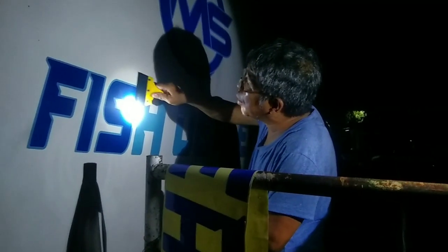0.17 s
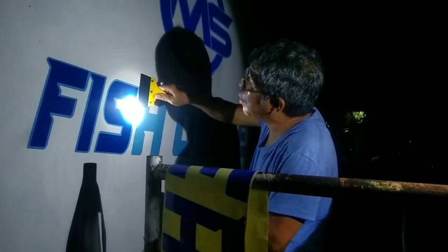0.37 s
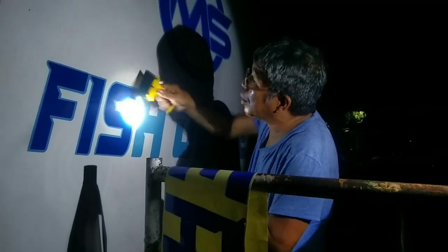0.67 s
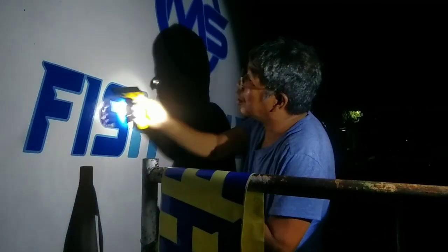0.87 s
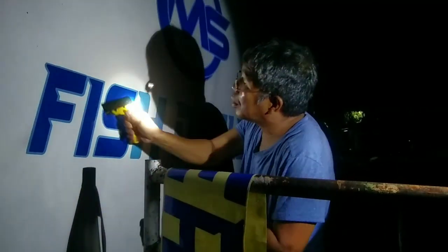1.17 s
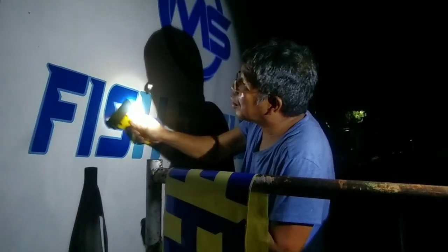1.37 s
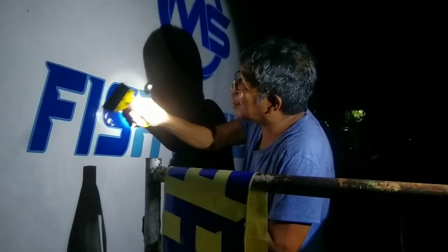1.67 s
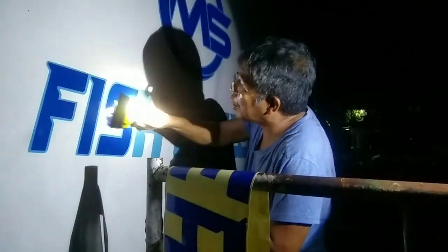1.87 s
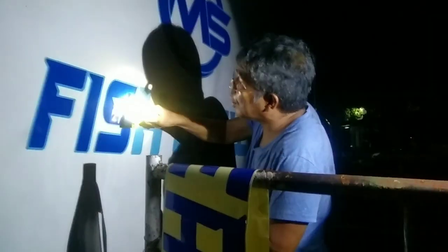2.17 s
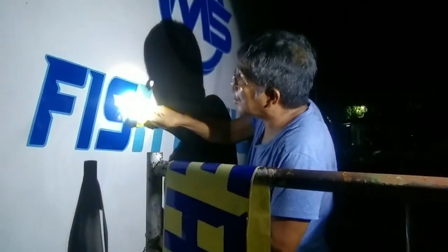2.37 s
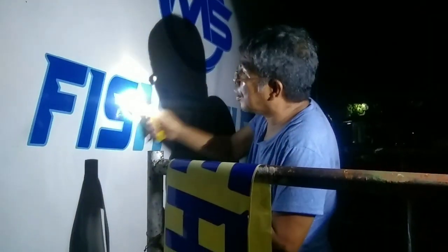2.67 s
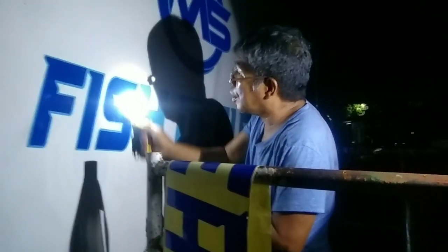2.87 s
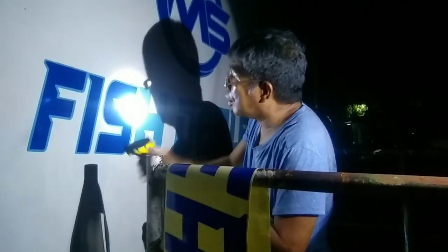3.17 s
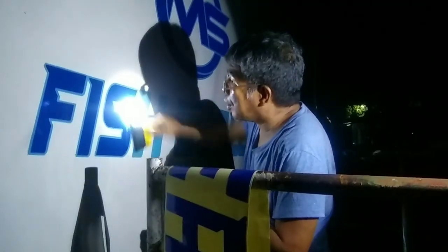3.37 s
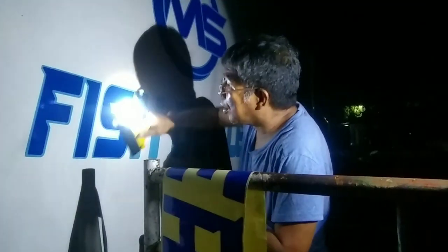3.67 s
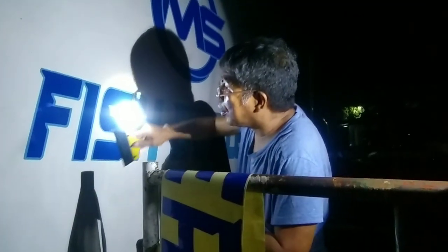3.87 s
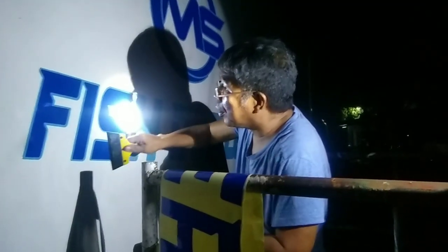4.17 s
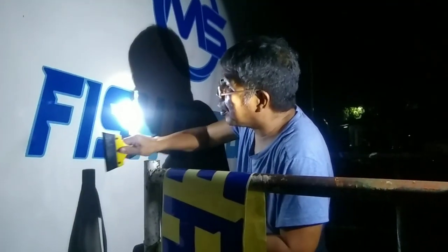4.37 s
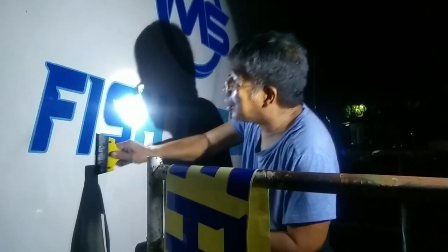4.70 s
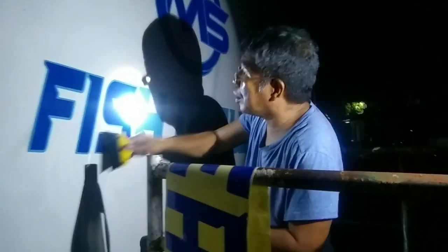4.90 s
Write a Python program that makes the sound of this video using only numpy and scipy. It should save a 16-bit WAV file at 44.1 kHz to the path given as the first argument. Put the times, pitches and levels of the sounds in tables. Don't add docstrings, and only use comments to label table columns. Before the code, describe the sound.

A close cricket chirps rapidly and steadily at night while a plastic squeegee softly rubs and taps a painted panel over faint engine hum.

```python
import sys
import numpy as np
from scipy import signal
from scipy.fft import rfft, irfft, next_fast_len
from scipy.io import wavfile
from scipy.ndimage import uniform_filter1d, map_coordinates

SR = 44100
rng = np.random.default_rng(int(sys.argv[2]) if len(sys.argv) > 2 else 0)


def elevation(decibels):
    levels = np.asarray(decibels, float)
    return 10 ** (levels / 20)


def store_pcm(level_fs):
    pcm = np.round(np.clip(level_fs, -1, 1) * 32767).astype(np.int16)
    wavfile.write(sys.argv[1], SR, np.atleast_2d(pcm).T)


N = 222117


def unit(x):
    return x / np.sqrt(np.mean(x ** 2) + 1e-20)


def curves(rows):
    s, *cols = np.transpose(rows)
    return [np.interp(np.arange(N) / SR, s, c) for c in cols]


def wobble(rate):
    knots = rng.standard_normal(int(N * rate / SR) + 4)
    return map_coordinates(knots, [np.arange(N) * rate / SR])


def humps(rows):
    t, total = np.arange(N) / SR, np.zeros(N)
    for s, length, height in rows:
        rise, fall = (t - s) / 0.039, (s + length - t) / 0.067
        total += height * np.clip(np.minimum(rise, fall), 0, 1) ** 2
    return total


def glide(hz):
    return np.sin(2 * np.pi * np.cumsum(hz) / SR)


def filtered(x, response):
    m = next_fast_len(len(x) + 8192)
    return irfft(rfft(x, m) * response(np.fft.rfftfreq(m, 1 / SR)), m)[:len(x)]


def shape(points):
    f, db = np.transpose(points)
    return lambda hz: elevation(np.interp(np.log(hz + 1), np.log(f + 1), db))


def band(lo_hz, hi_hz, steep):
    return lambda hz: 1 / np.sqrt((1 + (lo_hz / (hz + 1)) ** steep) * (1 + (hz / hi_hz) ** steep))


def patches(like, wide, long):
    field = uniform_filter1d(rng.standard_normal(like.shape), size=wide, axis=0)
    return unit(uniform_filter1d(field, size=long, axis=1))


def hiss(response, patchy_db, wide=4, long=3):
    z = signal.stft(rng.standard_normal(N), nperseg=1024)[2]
    z = z * elevation(patchy_db * patches(z, wide, long))
    return unit(filtered(signal.istft(z, nperseg=1024)[1][:N], response))


def blank():
    return np.zeros(N + 2 * SR)


def add(track, s, sound):
    track[SR + round(s * SR):][:len(sound)] += sound


def trim(track):
    return track[SR:SR + N]


def tail(t60, gap):
    t = np.arange(SR // 3) / SR
    x = rng.standard_normal(len(t)) * elevation(-60 * t / t60) * (t > gap)
    return x / np.linalg.norm(x)


# pitch in Hz, level in dB per Hz.
FLOOR_COLOUR = [(100, -20), (250, 5), (1500, 2), (2500, 1), (3300, 0), (4200, -1), (6000, 1), (9500, 3),
                (11500, 1), (12000, -7), (14000, -7), (15500, -8)]


def hiss_floor():
    return elevation(-86.5) * hiss(shape(FLOOR_COLOUR), patchy_db=1.2)


# pitch in Hz, level in dB per Hz.
RUMBLE_COLOUR = [(50, -61), (85, -4), (161, -2.5), (182, -8.5), (194, -22.5), (230, -21), (300, -53.5),
                 (510, -120)]
# pitch in Hz, level in dB per Hz.
DRONE_COLOUR = [(12, -60), (24, -22), (32, 1), (42, -14), (52, 5.5), (68, 7), (80, -13.5), (95, -8.5),
                (120, -61), (210, -120)]
# time in seconds, level in dB.
ENGINE_LOAD = [(0, -72), (.2, -67), (.7, -59), (1.8, -68), (1.95, -57), (2.9, -59), (3.4, -69), (3.6, -63),
               (3.95, -60.5), (4.1, -54.5), (4.4, -60), (5.04, -56.5)]
# time in seconds, level in dB.
FAR_RUMBLE = [(0, -56), (.25, -56.5), (.84, -62), (.98, -64.5), (1.3, -59), (1.8, -65.5), (2.2, -64.5),
              (3.1, -65), (3.45, -73), (3.65, -62), (3.87, -70.5), (4.1, -58), (5.04, -63)]
# start in seconds, length in seconds, level in dB, lowest part in dB against that.
ROCKING = [(-.03, 0.061, -46, -3), (0.147, 0.088, -75, 4), (1.151, 0.11, -64, 8), (1.882, 0.17, -66, -21),
           (2.93, 0.16, -67, 5.5), (3.001, 0.083, -80, 34), (3.664, 0.077, -62, 3), (3.988, 0.1, -66.5, 8),
           (4.122, 0.1, -67.5, 1), (4.31, 0.35, -74, 10), (4.77, 0.26, -75, -14), (4.944, 0.2, -76, 6)]


def engine():
    t = np.arange(N) / SR
    rock = np.zeros(N)
    for s, length, db, _ in ROCKING:
        settle_db = -59.5 * np.clip(t - s - .04, 0, .2)
        rock += humps([(s, length, elevation(db + 0.5))]) * elevation(settle_db)
    deep = humps([(s, length, elevation(db + deep_db)) for s, length, db, deep_db in ROCKING])
    traffic = elevation(curves(FAR_RUMBLE)[0] + 1.8 * wobble(6.6))

    line = glide(68 + 1.5 * wobble(7.4))
    drone = unit(2.0 * line + hiss(shape(DRONE_COLOUR), patchy_db=-3.3))
    rumble = elevation(1.2 * wobble(25)) * hiss(shape(RUMBLE_COLOUR), patchy_db=2.0)
    for hz in [121.8, 151.9, 174.4]:
        rumble = rumble + elevation(-10.5 + 2.6 * wobble(4)) * glide(hz + 2.45 * wobble(9))
    boom = hiss(band(210, 390, steep=30), patchy_db=3)

    load = elevation(curves(ENGINE_LOAD)[0] + 0.63 * wobble(7.5))
    hum = np.hypot(load, elevation(1) * deep) * drone
    return hum + np.hypot(traffic, elevation(11) * rock) * rumble + np.hypot(elevation(-36) * traffic, rock) * boom


# pitch in Hz, level in dB per Hz.
FAR_CRICKETS = [(3060, -84.5), (5200, -40), (6050, -23.5), (6230, -36), (6380, -6), (6790, 6), (7190, -5.5),
                (7460, -13), (7560, -13), (7750, -10), (8100, -17.5), (9000, -34), (11700, -81),
                (19800, -120)]


def far_crickets():
    return elevation(-60.0) * hiss(shape(FAR_CRICKETS), patchy_db=5)


# start in seconds, end in seconds, first pitch in Hz, last pitch in Hz, level in dB.
TINY_SINGERS = [(0, 1.25, 10680, 10700, 0), (.1, 2.1, 11050, 11100, 0), (2.1, 3.35, 10620, 10850, 0),
                (2.4, 3.9, 11050, 11320, -1), (3.85, 5.1, 10600, 10680, -2), (4, 5.1, 11100, 10900, 0),
                (.2, 1.7, 11350, 11300, -4), (2.7, 4.4, 11550, 11530, -6)]


def shimmer():
    t, lines = np.arange(N) / SR, 0
    for start, end, from_hz, to_hz, db in TINY_SINGERS:
        hz = np.interp(t, [start, end], [from_hz, to_hz]) + 32 * wobble(120)
        on = np.clip(np.minimum(t - start, end - t) / 0.093, 0, 1)
        lines = lines + on * elevation(db + 6 * wobble(40)) * glide(hz)
    beat = 1.3 + np.sin(np.pi * 118 * t) ** 2
    crowd = hiss(band(10550, 11450, steep=100), patchy_db=3)
    level_db = -78.5 - 2.5 * t / t[-1] + 2 * wobble(4)
    return elevation(level_db) * unit(beat * (unit(lines) + .55 * crowd))


# start in seconds, length in seconds, level in dB.
TRILLS = [
    (0.144, 0.615, -74.5),
    (2.514, 0.584, -73.5),
]
# start in seconds, length in seconds, level in dB.
TRILL_EDGES = [(0.302, .1, -8), (0.503, 0.28, -6), (2.6, .14, -2), (2.731, 0.16, -9), (2.857, 0.11, 1)]


def buzzer():
    t, level, effort = np.arange(N) / SR, np.zeros(N), np.zeros(N)
    for s, length, db in TRILLS:
        warm = np.clip((t - s) / min(0.13, length / 4), 0, 1)
        on = (t > s) * np.clip((s + length - t) / min(0.16, length / 2), 0, 1) ** 2
        level += on * elevation(db - 16 * (1 - warm))
        effort += on * np.clip((t - s) / length, 0, 1)
    strokes = np.cumsum(125 * (1 + .02 * wobble(20))) / SR
    tone = glide(3790 + 88.4 * (effort - .5) + 18 * wobble(6) + 22 * wobble(60))
    pulses = unit(tone * (.1 + np.sin(np.pi * strokes) ** 4) * elevation(1.5 * wobble(30)))
    wing = band(3650, 3880, steep=200)
    opening = humps([(s, length, elevation(db)) for s, length, db in TRILL_EDGES])
    edge = opening * hiss(band(3860, 4040, steep=200), patchy_db=2)
    return level * (unit(filtered(pulses, wing) + .8 * hiss(wing, patchy_db=2)) + .6 * edge)


# start in seconds, length in seconds, level in dB, first pitch in Hz, last pitch in Hz.
LOW_RASPS = [
    (-.06, 0.13, -61, 8650, 9360),
    (1.706, 0.12, -61.5, 9470, 9470),
    (4.951, 0.093, -60, 9240, 9330),
]
HIGH_CALLS = [
    (0.086, 0.019, -83, 14800, 15000),
    (1.937, 0.076, -65.5, 11900, 13350),
    (1.968, 0.055, -64.5, 14000, 14500),
    (1.945, .08, -75, 15400, 15300),
]
HIGH_WIDTHS = [460, 900, 1900, 250]
# pitch in Hz, gain in dB.
WING_COLOUR = [(8300, -1.5), (8800, 0), (9250, -1.5), (9800, 4), (10200, -7), (11400, 1)]


def katydids():
    out = blank()
    calls = [(*c, 1440, 95) for c in LOW_RASPS]
    calls += [(*c, width_hz, 140) for c, width_hz in zip(HIGH_CALLS, HIGH_WIDTHS)]
    for s, length, db, from_hz, to_hz, width_hz, rate in calls:
        t = np.arange(round(length * SR)) / SR
        slow = unit(filtered(rng.standard_normal(len(t)), band(1, width_hz / 2, steep=24)))
        carrier = glide(from_hz + (to_hz - from_hz) * t / length)
        strokes = 1.0 + np.sin(np.pi * rate * t) ** 2
        fade = np.clip(np.minimum(t / 0.019, (length - t) / 0.0058), 0, 1)
        call = elevation(db) * slow * carrier * strokes * fade
        add(out, s, call)
        add(out, s, elevation(-4.5) * signal.fftconvolve(call, tail(t60=.3, gap=.005)))
    return filtered(trim(out), shape(WING_COLOUR))


# start in seconds, peak in dB, pitch in Hz, length in seconds.
WHISTLES = [(0.18, -66, 8750, 0.1), (0.92, -66, 8770, 0.074), (1.094, -74, 8800, 0.13),
            (1.3544, -75, 8900, 0.034), (2.28, -67, 8640, 0.032), (2.72, -76, 8800, 0.087),
            (3.542, -73, 8890, 0.036), (3.713, -69, 8850, 0.019), (3.965, -66, 8630, 0.024),
            (4.623, -69, 8700, 0.04)]
SMALL_CHEEPS = [(0, -76, 5780, .1), (.62, -77, 5740, .14), (.87, -77, 5770, .1), (1.82, -83, 5760, .05),
                (2.28, -83, 5750, .06), (2.82, -69, 7800, .07), (4.2, -76, 5770, .14),
                (4.83, -74, 5750, .13), (4.55, -72, 7800, .05), (4.86, -72, 7750, .1)]
THIN_NOTES = [(4.558, -82, 3750, .04), (4.602, -81, 3760, .08), (4.727, -75, 3720, 0.075),
              (4.76, -76, 3460, 0.035), (4.79, -80, 3690, 0.058), (4.929, -66.5, 3700, 0.05),
              (4.993, -70, 3700, .07), (4.976, -76, 3900, .07), (4.42, -82, 3860, .04),
              (1.973, -79.5, 3700, 0.037), (2.237, -78, 3650, .04), (2.44, -81, 4980, .04),
              (.165, -73, 2300, .035), (.2, -77, 2310, .03), (.38, -78, 2330, 0.031), (.2, -83, 2850, .03),
              (.37, -85, 2780, .03), (.66, -76, 2820, .035), (0.28, -77, 4270, 0.055),
              (.43, -76, 4150, .06), (.3, -79, 3350, .035), (0.76, -76, 2280, .06),
              (.85, -72.5, 2550, 0.062), (.86, -79, 3050, .05), (1.01, -76, 2550, .05),
              (1.036, -78, 2770, .05), (1.24, -82, 2620, .035), (1.567, -80, 2570, 0.043),
              (1.898, -77, 2530, .05), (2.25, -78, 2320, 0.09), (2.3, -85, 2760, .04),
              (2.438, -80, 2620, 0.048), (3.307, -68, 2780, 0.067), (3.427, -76, 2760, .05),
              (4.44, -75, 2780, 0.11), (4.63, -70, 2630, 0.076), (4.67, -78, 2900, .035),
              (4.877, -70, 2600, 0.083), (4.95, -73, 2830, .06), (4, -54, 7310, 0.087),
              (1.66, -60, 7320, .05), (3.9, -77, 2700, .08), (3.72, -79, 2500, .06), (3.05, -77, 2550, .06)]


def whistles():
    out = blank()
    for s, db, hz, length in WHISTLES + SMALL_CHEEPS + THIN_NOTES:
        t = np.arange(round(length * SR)) / SR
        note = unit(filtered(rng.standard_normal(len(t)), band(hz - 50, hz + 50, steep=500)))
        add(out, s, elevation(db - 8) * np.sin(np.pi * t / length) * note)
    return filtered(trim(out), shape(WING_COLOUR))


# time in seconds, spread in
# seconds, pitch in Hz, change in dB.
RUB_STREAKS = [(0.0, 0.089, 580, 8), (0.0, 0.6, 380, -11), (0.09, 0.35, 1055, -8), (0.31, 0.085, 890, 11),
               (0.41, 0.13, 1400, 7), (0.43, 0.088, 754, -34), (0.47, 0.15, 2030, 17.5),
               (0.52, 0.055, 1136, 23), (0.81, 0.19, 1185, -20), (0.82, 0.13, 950, -11),
               (0.89, 0.019, 1680, 6), (0.91, 0.06, 505, 17), (0.91, 0.021, 1850, 12),
               (0.92, 0.044, 380, 0), (0.94, 0.063, 705, -20), (1.06, 0.067, 345, -3),
               (1.11, 0.11, 2070, 11.5), (1.34, 0.083, 338, -14), (1.36, 0.17, 524, -9.5),
               (1.39, 0.046, 1490, -10), (1.4, 0.03, 1123, 15.5), (1.5, 0.056, 2040, -18),
               (1.58, 0.05, 805, 10), (1.65, 0.12, 1136, -13), (1.71, 0.22, 404, 3.5),
               (2.02, 0.12, 1430, -15), (2.05, 0.084, 344, -15), (2.06, 0.035, 1310, 10.5),
               (2.11, 0.41, 500, -10), (2.15, 0.11, 623, 10.5), (2.16, 0.14, 1890, -18),
               (2.26, 0.036, 2040, 6), (2.28, 0.065, 385, 19), (2.28, 0.074, 1200, -15),
               (2.46, 0.076, 1034, 7.5), (2.47, 0.066, 850, 1), (2.48, 0.095, 506, -14),
               (2.52, 0.05, 1470, -7), (2.66, 0.045, 610, 8.5), (2.8, 0.34, 748, -11.5),
               (3.13, 0.098, 350, -12), (3.13, 0.38, 336, -21.5), (3.34, 0.037, 850, 3.5),
               (3.44, 0.05, 1900, -4), (3.47, 0.091, 720, -13), (3.89, 0.05, 896, -2.5),
               (3.98, 0.054, 694, -9), (4.56, 0.27, 1940, 6.5), (4.6, 0.4, 328, -9.5),
               (4.64, 0.49, 732, -8)]


def gated(x, lo_hz, hi_hz):
    hz, t, z = signal.stft(x, SR, nperseg=1024)
    s, pitch = np.arange(N) / SR, hz[:, None]
    above = (pitch - np.interp(t, s, lo_hz)) / 40
    below = (np.interp(t, s, hi_hz) - pitch) / 60
    inside = np.maximum(np.minimum(above, below), -4.6)
    gain_db = np.clip(9 * (inside + 1.1 * patches(z, 3, 5)), -50, 0)
    at, spread, at_hz, db = np.transpose(RUB_STREAKS)
    in_pitch = np.exp(-.5 * ((pitch - at_hz) / 58.6) ** 2)
    in_time = np.exp(-.5 * ((t[:, None] - at) / spread) ** 2)
    gain_db = gain_db + db * in_pitch @ in_time.T
    return signal.istft(z * elevation(gain_db), SR, nperseg=1024)[1][:N]


# lower edge in Hz, upper edge in Hz.
RUB_PARTS = [
    (250, 750),
    (750, 1250),
    (1250, 3000),
]
# time in seconds, pressure in dB.
PRESSURE = [(0, -63), (.2, -64), (.4, -67), (.5, -75), (.66, -61), (.9, -66.5), (1.1, -66), (1.25, -64.5),
            (1.55, -60.5), (1.85, -66.5), (2.15, -61.5), (2.6, -64), (3, -60), (3.5, -60), (3.68, -58.5),
            (4.1, -59), (4.6, -57.5), (5.04, -56.5)]
# start in seconds, length in seconds, level in dB, lowest pitch in Hz.
FLAT_STROKES = [(-.05, 0.3, -65.5, 437), (0.25, 0.26, -66.5, 538), (0.668, 0.4, -75.5, 460),
                (1.012, 0.13, -65.5, 473), (1.161, 0.122, -62, 310), (1.272, 0.3, -66.5, 587),
                (1.49, 0.31, -76, 355), (1.905, 0.14, -60.5, 304), (2.016, 0.2, -62, 630),
                (2.195, 0.4, -64, 623), (2.583, 0.38, -70, 564), (2.935, 0.26, -59.5, 357),
                (3.133, 0.294, -60, 490), (3.38, 0.27, -58.5, 427), (3.614, 0.3, -63.5, 406),
                (4.01, 0.34, -63.5, 447), (4.263, 0.35, -58.5, 304), (4.553, 0.67, -57, 400)]
# start in seconds, length in seconds, lift in Hz.
RIM_LIFTS = [
    (.82, .22, 260),
    (3.235, .1, 495),
    (4.3, .9, 185),
]
# pitch in Hz, gain in dB.
PANEL_COLOUR = [(950, 0), (1150, -4.5), (1350, 0.5), (1750, 0.5), (2100, -8.5), (2700, -2.5)]


def rubbing():
    press_db, = curves(PRESSURE)
    mean_db = press_db.mean()
    swing_db = press_db - mean_db
    low = elevation(press_db - 27) + humps([(s, length, elevation(db)) for s, length, db, _ in FLAT_STROKES])
    gains = [low * elevation(0.91 * wobble(21.0)),
             elevation(mean_db - 3 + 1.2 * swing_db + 0.65 * wobble(8.9)),
             elevation(press_db + 0.14 * wobble(27))]
    rub = np.zeros(N)
    for gain, (lo, hi) in zip(gains, RUB_PARTS):
        rub += gain * hiss(band(lo, hi, steep=16), patchy_db=4.0, wide=2, long=9)

    rest_hz = 600
    dips = humps([(s, length, hz - rest_hz) for s, length, _, hz in FLAT_STROKES])
    lo_hz = np.clip(rest_hz + dips + 20 * wobble(14), 250, 600)
    rise_hz = 25 * uniform_filter1d(swing_db, size=20000)
    hi_hz = 2093 + rise_hz + humps(RIM_LIFTS) + 56.4 * wobble(6.2)
    leak = elevation(-84) * hiss(band(180, 830, steep=13), patchy_db=5.0)
    return gated(filtered(rub, shape(PANEL_COLOUR)), lo_hz, hi_hz) + leak


def ring_time():
    t = np.arange(SR // 3) / SR
    return t, (1 - np.exp(-t / .001)) ** 2


# start in seconds, peak in dB, crack in dB against that, tick in dB against that.
PANEL_TAPS = [
    (1.184, -36, -24, -56),
    (1.909, -40, -17, -48),
    (2.972, -36.5, -22, -50),
    (3.239, -43, -5, -27),
    (3.657, -39, -4, -27),
    (4.032, -50, -14, -45),
]
# pitch in Hz, level in dB, seconds to fade by 60 dB.
PANEL_TONES = [(290, -23, 0.038), (440, -13.5, 0.11), (654, -17.5, 0.05), (920, -11, 0.019)]


def taps():
    out, (t, onset) = blank(), ring_time()
    for s, db, crack_db, tick_db in PANEL_TAPS:
        ring = 0
        for hz, tone_db, t60 in PANEL_TONES:
            fade = elevation(tone_db + rng.normal(0, 3) - 60 * t / t60)
            ring = ring + fade * np.sin(2 * np.pi * hz * (1 + rng.normal(0, .03)) * t)
        puff = rng.standard_normal(len(t)) * elevation(-60 * t / .035) * onset
        crack = elevation(crack_db + 15) * filtered(puff, band(450, 2000, steep=20))
        tick = elevation(tick_db + 5) * filtered(puff, band(2600, 4700, steep=30))
        add(out, s, elevation(db - 1.0) * (onset * ring + crack + tick))
    return trim(out)


# start in seconds, peak in dB, pitch in Hz.
EDGE_SNAPS = [
    (1.1868, -48, 444),
    (3.66, -39.5, 745),
]


def snaps():
    out, (t, _) = blank(), ring_time()
    for s, db, hz in EDGE_SNAPS:
        add(out, s, elevation(db - 60 * t / .011) * np.minimum(t / 0.00034, 1) * np.sin(2 * np.pi * hz * t))
    return trim(out)


# start in seconds, level in dB, pitch in Hz, seconds to fade by 60 dB.
RAIL_CLINKS = [(3.238, -64.5, 3160, 0.12), (3.242, -55.5, 2150, 0.053), (3.24, -68, 2970, 0.24),
               (3.348, -69.5, 4140, 0.17), (3.349, -80, 3540, 0.21), (3.657, -71, 3600, 0.033)]


def clinks():
    out, (t, onset) = blank(), ring_time()
    for s, db, hz, t60 in RAIL_CLINKS:
        blur = unit(filtered(rng.standard_normal(len(t)), band(hz * 0.934, hz * 1.0, steep=63)))
        add(out, s, elevation(db - 60 * t / t60) * onset * blur)
    return trim(out)


def squeegee():
    return rubbing() + taps() + snaps() + clinks()


# delay in milliseconds, level in dB.
ECHOES = [(3.333, -18), (4.748, -8.7), (5.873, -14.5), (7.107, -10.5), (9.364, -16), (12.413, -24),
          (14.331, -21), (16.222, -22.5), (18.734, -22.5), (24.5, -19), (27.2, -19)]
# peak of the main stroke in seconds, level in dB, middle stroke in dB against it.
CHIRPS = [(-0.0135, -36, 9), (0.0863, -30.5, -6), (0.1864, -30, -5.5), (0.2852, -30.5, -4.5),
          (0.384, -31, -1), (0.486, -31, -5.3), (0.5888, -29.5, -4.8), (0.687, -29.5, -5),
          (0.7836, -29, -7), (0.8856, -30.5, -7.5), (0.988, -29.5, -6.5), (1.0888, -31, -2),
          (1.19, -30, -4), (1.289, -28.5, -5), (1.3887, -29.5, -3.5), (1.4868, -30.5, -1),
          (1.5859, -29.5, -7), (1.687, -30.5, -8), (1.788, -29, -5), (1.884, -30.5, -0.5),
          (1.984, -30, -4.7), (2.0845, -30, -5.5), (2.1897, -29.5, -7), (2.2876, -29, -3),
          (2.3852, -30, -5.5), (2.4855, -31, -2.5), (2.5848, -31, -6), (2.6845, -30.5, -10.5),
          (2.783, -30.5, -5), (2.8818, -31.5, -3), (2.9812, -29.5, -5), (3.0783, -30.5, -5.5),
          (3.1787, -30, -7), (3.2755, -28.5, -9.5), (3.376, -31, -4), (3.4737, -31.5, -3),
          (3.5747, -32.5, -5), (3.674, -31, -10), (3.773, -31, -4.5), (3.8709, -30.5, -4),
          (3.9704, -31, -4.5), (4.069, -30.5, -4.5), (4.1672, -30, -6.5), (4.2626, -29, -7.5),
          (4.3614, -31.5, -3), (4.4585, -30, -6), (4.5567, -30.5, -5), (4.6556, -31, -3.5),
          (4.7525, -30.5, -6), (4.851, -31, -4), (4.9529, -30, -3), (5.05, -40, -11)]
# time in seconds, first stroke in dB against main.
FIRST_STROKES = [(0.09, -29), (0.38, -12), (0.49, -27), (0.59, -18), (0.78, -20), (0.89, -13), (0.99, -23),
                 (1.09, -11), (1.19, -13), (1.39, -19), (1.49, -19), (1.59, -27), (1.69, -11), (1.88, -15),
                 (2.39, -18), (3.38, -27), (3.47, -16), (3.77, -13.5), (4.07, -19), (4.26, -9.5),
                 (4.36, -20), (4.46, -15), (4.66, -10), (4.75, -19), (4.85, -10), (4.95, -8.5)]


def wing_colour(hz):
    main = band(6350, 7340, steep=130)(hz) + .012 * band(5500, 8300, steep=40)(hz)
    return main + band(13500, 13650, steep=500)(hz) + 1.8 * band(14100, 14260, steep=500)(hz)


def cricket():
    out, t = blank(), np.arange(round(.01086 * SR)) / SR
    u = t / t[-1]
    wall_ms, wall_db = np.transpose(ECHOES)
    swell = np.abs(np.sin(np.pi * u)) ** 1.4
    for (s, db, mid_db), r in zip(CHIRPS, rng.standard_normal((len(CHIRPS), 12))):
        first_db = max([lead_db for at, lead_db in FIRST_STROKES if abs(at - s) < .03], default=-30)
        chirp = np.zeros(SR // 10)
        for k, rel_db in enumerate([first_db - 3.0, mid_db - .3, 0]):
            hz = (7149 - 858 * (1 + .06 * r[k + 9]) * u ** 1.8) * (1 + .002 * r[k])
            phase = 2 * np.pi * np.cumsum(hz) / SR + 3 * r[k + 3]
            overtone = elevation(-53 + 5 * r[k + 6]) * np.sin(2 * phase)
            stroke = swell * (np.sin(phase) + overtone)
            late = .0006 * r[k + 6] * (k < 2)
            start = round((.0155 * k + late + .0027) * SR)
            chirp[start:][:len(t)] += elevation(db + rel_db - 2.5) * stroke

        stir = rng.standard_normal((2, len(ECHOES)))
        delay_ms, gain = wall_ms + .006 * stir[0], elevation(wall_db + 1.5 * stir[1])

        def walls(f):
            return 1 + np.exp(-2j * np.pi * np.outer(f, delay_ms) / 1000) @ gain

        add(out, s - .0397, filtered(chirp, walls))
        add(out, s - .0397, elevation(-9.0) * signal.fftconvolve(chirp, tail(t60=0.22, gap=0.0067)))
    return filtered(trim(out), wing_colour)


def lagging_power(song, size, lag):
    return np.pad(uniform_filter1d(song ** 2, size=size), (lag, 0))[:N] / np.mean(song ** 2)


def scene():
    song = cricket() + far_crickets()
    night = song + shimmer() + hiss_floor()
    loud = lagging_power(song, 1000, 450)
    after = lagging_power(song, 2600, 1200)
    duck = elevation(-22 * np.clip(loud - 1.4 + .9 * wobble(9), 0, 1))
    stays = elevation(-24 * np.clip(2 * after - 1.9 + 1.1 * wobble(4), 0, 1))
    under = elevation(-20 * np.clip(loud - 1.9 + 1.2 * wobble(9), 0, 1))

    night = night + (stays - 1) * filtered(night, band(8950, 9700, steep=90))
    upper = filtered(night, band(8600, 10350, steep=70))
    night = night + (under - 1) * filtered(night, band(5800, 6230, steep=120))
    night = night + (duck - 1) * upper
    return (night + katydids() + whistles() + buzzer() + engine() + squeegee())[None]


def roll_off(x):
    return signal.sosfilt(signal.butter(12, 15690, fs=SR, output="sos"), x)


def record(dry):
    mix = filtered(dry[0], lambda hz: hz < 15560)[None]
    return roll_off(mix)


dry = scene()
out = record(dry)
store_pcm(out)
```